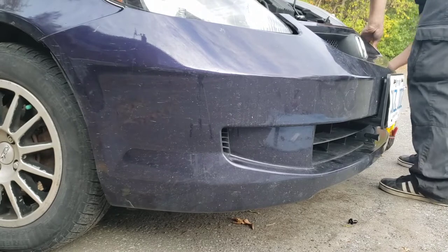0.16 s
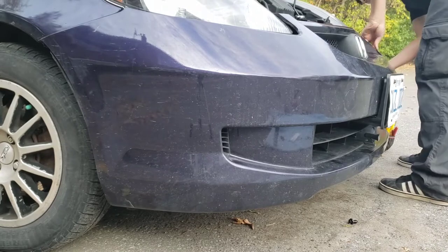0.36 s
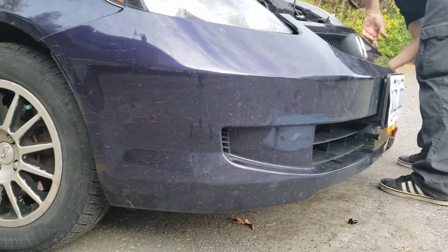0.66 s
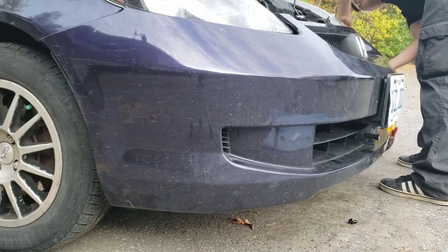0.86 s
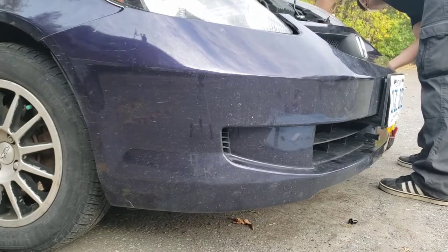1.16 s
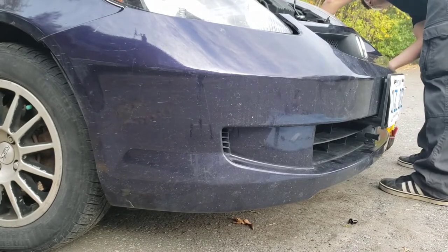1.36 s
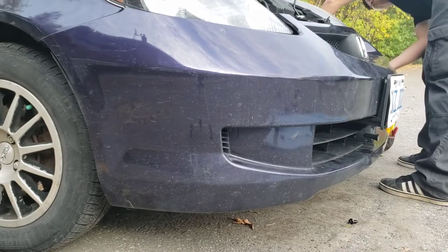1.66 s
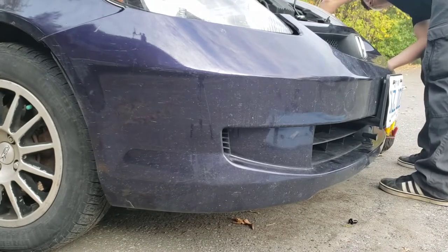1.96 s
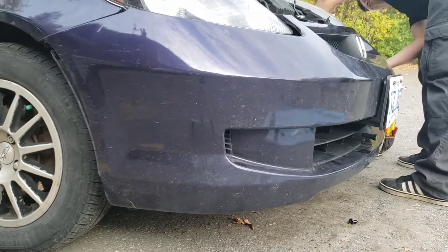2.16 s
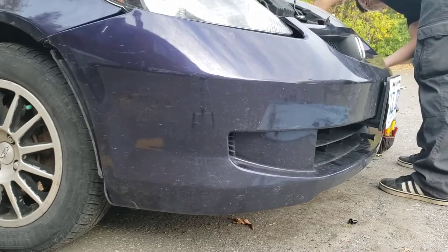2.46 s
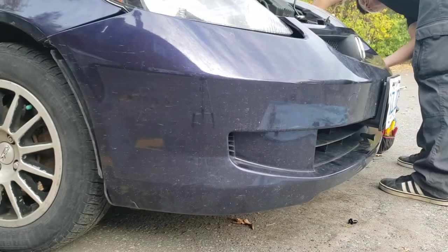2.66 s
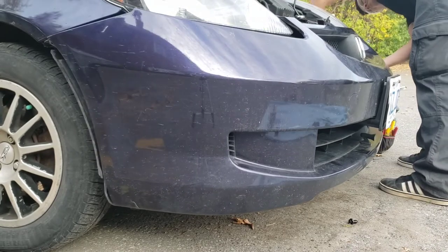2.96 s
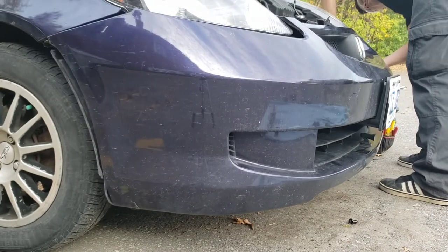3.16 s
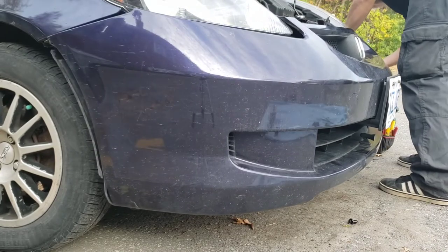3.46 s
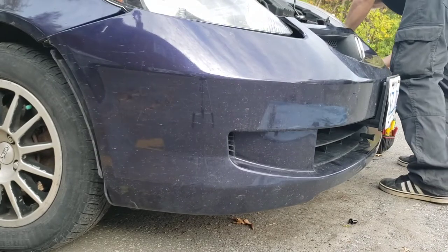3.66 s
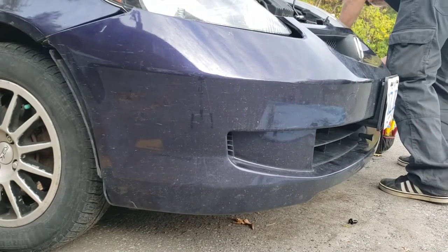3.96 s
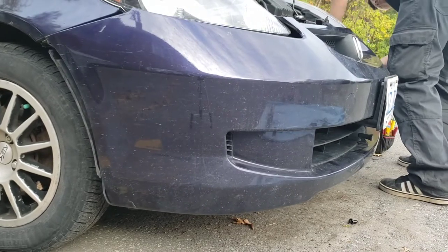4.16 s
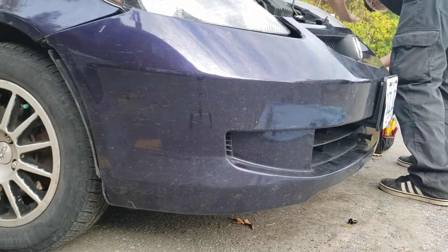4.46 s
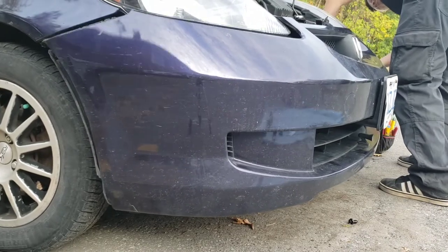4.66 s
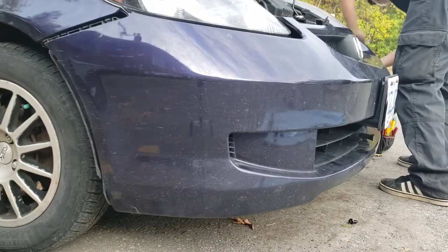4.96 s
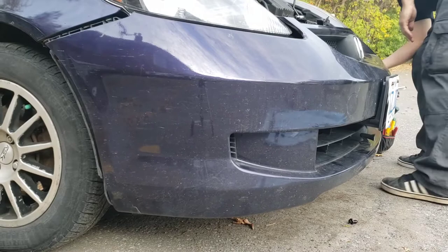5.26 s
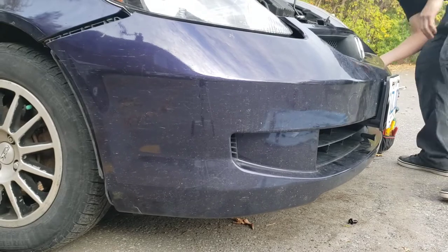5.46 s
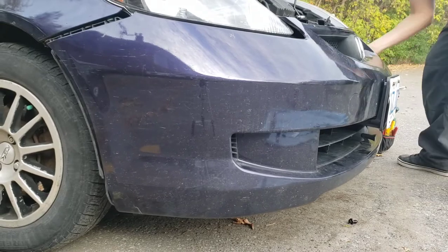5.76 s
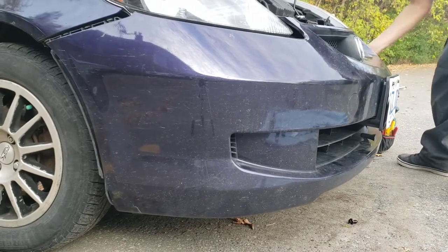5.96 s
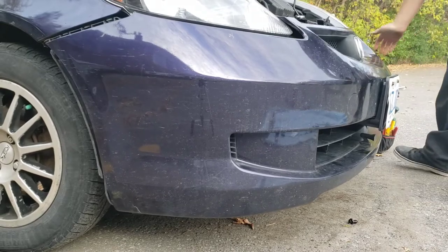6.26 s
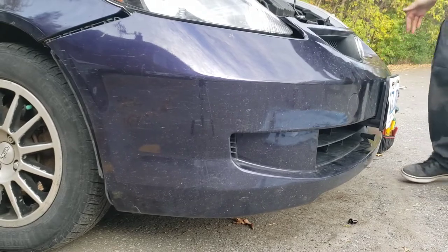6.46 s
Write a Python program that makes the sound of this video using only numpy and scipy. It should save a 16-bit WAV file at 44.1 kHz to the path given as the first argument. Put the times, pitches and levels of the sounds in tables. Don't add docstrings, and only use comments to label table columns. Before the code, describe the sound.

Outdoors, hands fit a loose car panel with light clacking knocks and a firmer push, then one hard rattling slam over faint engine and traffic rumble.

```python
import sys
import numpy as np
from scipy import signal
from scipy.io import wavfile

SR = 44100
rng = np.random.default_rng(int(sys.argv[2]) if len(sys.argv) > 2 else 0)


def int16_out(signal):
    q = np.round(np.clip(np.atleast_2d(signal).T, -1, 1) * 32767)
    wavfile.write(sys.argv[1], SR, q.astype(np.int16))


def convert_level_to_amplitude(level_db):
    exponent = np.asarray(level_db, float) / 20
    return 10 ** exponent


N = 291501
EDGES_HZ = 23.5 * 2 ** np.arange(0, 9.7, .5)

# (multiple of idle rate [-], level [dB])
IDLE_ORDERS_DB = [(1, 7), (2, 2), (3, -12), (4, 0), (5, 1.5), (6, -0.5), (7, -3), (8, -8.5), (9, -14.5),
                  (10, -10.5)]
IDLE_HZ, IDLE_WANDER_HZ, IDLE_DB, IDLE_FADE_DB_PER_S = 28.6, 0.2496, -41.5, 0.37

# (frequency [Hz], density [dB/Hz])
RUMBLE_SPECTRUM_DB = [(13, -51), (22, -11.5), (38, -4.5), (64, 1.5), (91, 4.5), (135, -11), (178, -4),
                      (304, -18), (365, -25.5), (500, -26), (650, -50), (1100, -120)]
# (frequency [Hz], density [dB/Hz])
ROAR_SPECTRUM_DB = [(150, -28), (250, -7.5), (304, -7), (380, -16.5), (692, -6), (1310, -3.5), (1760, -7),
                    (2710, -18), (3690, -16), (5010, -54), (7000, -62), (9100, -94), (15400, -120)]
# (time [s], level [dB])
TRAFFIC_DB = [(0.0, -38.5), (1.1, -39.5), (1.6, -36.5), (2.0, -38.5), (2.23, -31.5), (2.4, -42),
              (2.8, -36.5), (3.1, -40.5), (3.42, -37.5), (3.9, -39.5), (5.43, -41), (5.72, -38.5),
              (6.17, -41.5), (6.61, -40.5)]
# (time [s], hollow note [Hz], level [dB])
PASSING_HZ_DB = [(0.0, 700, -55.5), (1.12, 695, -49.5), (2.1, 632, -51.5), (2.4, 639, -45.5),
                 (2.8, 630, -42.5), (3.05, 612.4, -47.5), (3.28, 704.5, -45.5), (3.48, 767, -43),
                 (3.7, 730, -47), (3.9, 687, -51), (5.0, 698, -53), (5.72, 700, -48.5), (6.61, 694, -55)]
ROAR_DB, ROAR_TRAFFIC_SHARE, ROAR_PASSING_SHARE = -56.5, 0.13, 0.2
WHINE_DB, WHINE_FROM_S, WHINE_TO_S = -51, 1.52, 4.37

# (frequency [Hz], left-right correlation [-])
FAR_ALIKE = [(60, 1), (130, 0.94), (290, 0.71), (640, 0.45), (1410, -0.81), (3100, 1), (6820, -0.55),
             (15000, 0.16)]
# (frequency [Hz], left minus right [dB])
FAR_BALANCE_DB = [(60, 0.5), (180, -0.5), (550, 1), (1650, 1), (4970, 20.5), (15000, -9.5)]
# (frequency [Hz], left-right correlation [-])
NEAR_ALIKE = [(60, 1.0), (130, 0.94), (290, 1), (640, 0.98), (1410, 0.61), (3100, 0.1), (6820, 0.082),
              (15000, 0.1)]
# (frequency [Hz], left minus right [dB])
NEAR_BALANCE_DB = [(60, 2.5), (180, 0.5), (550, 1.5), (1650, 4), (4970, -1), (15000, -4.5)]
FAR_LAG_S, NEAR_LAG_S = .00007, .0001

# (time [s], bright peak [dB], length [s], dull part re bright [dB])
MOVES = [(0.02, -62, 0.23, 1), (0.14, -64, 0.2, -6), (0.304, -83, 0.36, 1), (0.544, -75.5, 0.28, -14),
         (1.08, -67, 0.19, -6), (1.242, -81, 0.23, 3), (2.26, -66, 0.26, -1), (2.4, -80.5, 0.42, 0),
         (3.41, -79, 0.24, 0), (3.603, -83, 0.35, 2), (3.907, -74.5, 0.28, -2), (5.506, -68.5, 0.6, -2),
         (5.578, -58, 0.1, -10), (5.66, -68, 0.35, -3.5), (6.15, -73, 0.8, -2.5), (6.258, -64, 0.2, 1.5)]
STILL_DB, STILL_DULL_DB = -85.5, 8.0
RISE_SHARE, SWING_DB, ROUNDNESS = 0.42, 20.5, 1.26

# (time [s], peak [dB], bright part re dull [dB])
GRIT_TICKS = [(0.024, -43, -14), (0.118, -56, 8), (1.054, -52, -8), (1.6385, -42, -3), (2.231, -43, 6),
              (2.2495, -43, 7), (2.304, -42, 9), (2.346, -55, 6), (3.509, -48, 0), (3.528, -50, -6),
              (3.8843, -53, 7), (3.906, -46, 3), (4.1858, -58, -9), (5.2784, -56, 0), (5.5515, -44, 4),
              (5.5599, -40.5, 10), (5.5746, -36.5, 13), (5.5885, -42.5, 18), (5.601, -44, 0),
              (5.656, -48, 3), (5.9832, -63, 6), (6.0586, -56, 3), (6.0896, -54, 3), (6.119, -43, 6),
              (6.125, -58, 6), (6.145, -56, 0), (6.1555, -48, 2), (6.1765, -53, 8), (6.194, -45, 2),
              (6.217, -47, 2), (6.2374, -44, 2), (6.2452, -42, 5), (6.2505, -44, 0), (6.271, -44, 2),
              (6.287, -54, 8), (6.295, -47, 4), (6.331, -48, -4), (6.347, -53, -8)]
GRIT_T60_S, SCUFF_DB, SCUFF_T60_S = 0.0078, -41.5, 0.03

# (time [s], length [s], start [Hz], end [Hz], peak [dB])
STREAKS = [(2.15, .05, 620, 620, -42), (2.43, .12, 600, 600, -47), (2.42, .13, 650, 645, -43),
           (2.43, .11, 697, 690, -47), (2.6, .12, 600, 585, -48), (2.66, .17, 630, 642, -44),
           (2.66, .18, 545, 545, -46), (2.88, .09, 650, 630, -44), (2.93, .14, 540, 545, -46),
           (3.08, .14, 648, 645, -46), (3.17, .09, 805, 800, -48), (3.22, .12, 770, 770, -48),
           (3.33, .08, 670, 678, -46), (3.36, .16, 778, 750, -43), (3.49, .08, 660, 640, -46),
           (3.58, .08, 760, 760, -49)]
STREAK_WOBBLE_RAD = 1.3

# (time [s], peak [dB], frequency [Hz], t60 [s])
PANEL_NOTES = [(1.617, -26, 1440, 0.034), (2.198, -24, 559, 0.13), (2.305, -20, 1290, 0.038),
               (3.515, -40, 1650, 0.07), (3.795, -17, 565, 0.11), (3.797, -13.5, 1322, 0.04),
               (3.797, -32, 3320, 0.035), (4.652, -13.5, 286, 0.2), (4.655, -21, 360, .15),
               (3.512, -34, 400, .08), (3.243, -36, 600, .05), (4.653, -18, 452, 0.13),
               (4.648, -16, 1317, 0.08), (3.80, -23, 1008, 0.086), (5.79, -32, 390, 0.07),
               (1.640, -24, 2050, 0.027), (2.3065, -16, 213, .14), (3.80, -22.5, 782, .1),
               (3.81, -32, 255, 0.17), (4.652, -27, 821, 0.14), (4.652, -19, 1525, .1),
               (4.652, -26.5, 2430, 0.09), (4.652, -20, 3520, .09), (4.6453, -5, 156, .07),
               (4.651, -18, 53, .25), (4.644, -17, 85, .15), (4.656, -23, 607, .2), (4.66, -26, 685, .2),
               (4.651, -21, 917, .15), (4.66, -26, 1194, .2), (4.65, -21, 1800, .06),
               (4.655, -29, 1965, .13), (4.68, -30, 2627, .1), (4.675, -29, 2918, .1),
               (4.655, -24, 3391, .09), (4.69, -27, 245, .15), (4.685, -29, 764, .2), (3.80, -21, 305, .2),
               (3.80, -29, 1195, .1), (3.80, -30, 1405, .1), (3.80, -36, 1744, .1), (3.82, -26, 95, .12),
               (2.3065, -15, 285, .12), (2.306, -29, 603, .05), (2.305, -30, 2400, .04),
               (2.198, -28, 220, .09), (2.22, -32, 791, .1), (2.2, -30, 90, .1), (2.255, -32, 270, .12)]
# (frequency [Hz], width [Hz], level [dB])
PANEL_MODES = [(441, 17.7, -14), (820, 160, 4), (1390, 210, -13.5), (1560, 29, -3.5), (1870, 370, -9.5),
               (1900, 13, -12.5), (2060, 38, -8), (2430, 61, -8), (2840, 380, -9), (2987, 69, -5),
               (3374, 44, -8.5), (3800, 25, -35), (4340, 43, -36), (4800, 27, -33), (4750, 120, -12),
               (5550, 38, -24.5)]
# (frequency [Hz], density [dB/Hz])
BLOW_SPECTRUM_DB = [(40, -18), (60, 6), (130, -3), (280, -5), (600, -4.5), (1300, -7.5), (2500, -22.5),
                    (4500, -28.5), (7000, -31.5), (12000, -54), (16000, -34)]
# (frequency [Hz], t60 [s])
TAIL_T60_S = [(50, 0.21), (300, 0.23), (1500, 0.15), (6000, 0.21), (13000, 0.11)]
ECHO_DB, ECHO_T60_S = -16, 0.57
# (time [s], peak [dB], t60 [s])
SHELL_BOOMS = [
    (1.639, -37, 0.11),
    (2.199, -30, 0.078),
    (2.308, -24.5, 0.085),
    (3.799, -21, 0.14),
    (4.640, -15, 0.068),
    (4.679, -37, 0.051),
]
# (time [s], peak [dB], t60 [s], topmost half-octave re rest [dB])
SIZZLES = [(1.615, -64, .04, 0), (1.638, -36, .03, -2), (2.196, -47, .06, 0), (2.219, -46, .05, 0),
           (2.2305, -35, .025, 0), (2.238, -43, .05, 0), (2.249, -34, .025, 0), (2.260, -41, .06, 0),
           (2.274, -44, .06, 0), (2.287, -44, .06, 0), (2.303, -31, .018, 2), (2.310, -47, .06, 0),
           (2.416, -54, .05, 0), (3.508, -38, .07, -2), (3.74, -58, .06, 0), (3.778, -52, .1, 0),
           (3.792, -40, .06, -8), (3.798, -35, .07, -6), (3.812, -45, .08, -7), (4.645, -28, .04, 0),
           (4.650, -13, .035, 1), (4.660, -21, .05, 0), (4.671, -20, .045, 3), (4.684, -22, .035, 0),
           (6.197, -55, .06, 0), (6.24, -47, .04, 0), (6.288, -55, .06, 0)]

# (time [s], knock peak [dB], thud [dB], crack [dB])
KNOCKS = [(1.369, -41, -32, -60), (1.615, -17.5, -29.5, -52), (1.638, -18.5, -33, -33),
          (2.163, -28, -28, -60), (2.195, -14.5, -24, -39), (2.217, -19, -30, -38.5),
          (2.230, -21, -39, -36), (2.248, -23.5, -34, -37), (2.264, -24, -29.5, -41),
          (2.276, -23, -32, -44), (2.303, -11, -28, -32), (2.319, -30, -30, -44),
          (2.413, -27.5, -30.5, -50), (2.524, -34, -42, -64), (2.919, -33, -30, -62),
          (2.937, -40, -31, -53), (3.02, -30, -38, -74), (3.241, -25, -38, -64), (3.509, -27.5, -29.5, -41),
          (3.740, -25, -29.5, -50), (3.785, -16.5, -24, -53), (3.791, -14.5, -19, -31),
          (3.798, -15, -21, -35), (3.812, -19, -26, -37), (3.825, -24, -30, -51), (5.79, -34, -30, -66),
          (6.197, -50, -38, -46), (6.24, -34, -45, -39.5), (6.288, -45, -42, -46)]
KNOCK_T60_S, KNOCK_SIZZLE_DB = 0.046, -6.5
SOFT_DB, SOFT_HZ, FIRM_DB, FIRM_HZ, SPOT_SPREAD = -30, 154.5, -29.5, 260, 0.1
# (time [s], knock peak [dB], thud [dB], crack [dB], rattle t60 [s])
SLAM_STEPS = [
    (4.643, -9, -24, -34, 0.1),
    (4.648, -5, -30, -19, 0.037),
    (4.650, -4, -30, -15, 0.04),
    (4.657, -12, -23, -20, 0.046),
    (4.673, -14.5, -40, -24, 0.051),
    (4.684, -12, -26.5, -26, 0.035),
]
SLAM_THUD_HZ, SLAM_SIZZLE_DB, SIZZLE_LASTS = 156, -1.5, 1.4
BOUNCES, BOUNCE_S, BOUNCE_GAP_S, BOUNCE_SLOWING, BOUNCE_T60_S = 6, 4.666, 0.0067, 1.2, 0.061
BOUNCE_DB, BOUNCE_LOSS_DB = (-24.5, -28, -27.5), (3.5, 3, 10)

MIC_DIP_HZ, MIC_DIP_WIDTH_HZ, MIC_DIP_DEPTH = 8090, 3800, 0.79
MIC_PEAK_HZ, MIC_PEAK_WIDTH_HZ, MIC_PEAK_DB = 12800, 2200, -1
DUCK_DB, DUCK_S, DUCK_TAKES_S = -5.5, 4.747, 0.25


def rms_one(x):
    return x / np.sqrt(np.mean(x ** 2) + 1e-20)


def in_time(rows):
    s, *columns = np.transpose(rows)
    return [np.interp(np.arange(N) / SR, s, c) for c in columns]


def at_hz(points, hz):
    table_hz, values = np.transpose(points)
    return np.interp(np.log(hz), np.log(table_hz), values)


def drift(rate_hz):
    r = np.exp(-80 * np.pi * rate_hz / SR)
    slow = signal.lfilter([1], [1, -2 * r, r * r], rng.standard_normal(N // 40 + 2002))[2000:]
    return np.interp(np.arange(N) / 40, np.arange(len(slow)), rms_one(slow))


def decay(clicks, t60_s):
    return signal.lfilter([1], [1, -convert_level_to_amplitude(-60 / (t60_s * SR))], clicks + 1e-18)


def resonance(x, hz, width_hz):
    r = np.exp(-np.pi * width_hz / SR)
    poles = [1, -2 * r * np.cos(2 * np.pi * hz / SR), r * r]
    return signal.lfilter([(1 - r * r) / 2, 0, (r * r - 1) / 2], poles, x)


def steep(x, hz, kind):
    return signal.sosfilt(signal.butter(4, hz, kind, fs=SR, output="sos"), x)


def band(x, k):
    return signal.sosfilt(signal.butter(2, EDGES_HZ[k:k + 2], "band", fs=SR, output="sos"), x)


def band_centre_hz(k):
    return np.sqrt(EDGES_HZ[k] * EDGES_HZ[k + 1])


def ports(pair, alike):
    return np.sqrt(1 + alike) * pair[0] + np.sqrt(1 - alike) * pair[1] * np.array([[1], [-1]])


def balance(left_minus_right_db):
    return convert_level_to_amplitude(left_minus_right_db * np.array([[.5], [-.5]]))


def grains(per_s, spread_db):
    sizes = convert_level_to_amplitude(spread_db * np.minimum(rng.exponential(1, (2, N)), 4)) * rng.choice([-1, 1], (2, N))
    return rms_one(sizes * (rng.random((2, N)) < per_s / SR))


def arrive(x, lag_s):
    n = np.arange(N)
    return np.array([np.interp(n - round(lag_s * SR), n, x[0]), x[1]])


def surroundings():
    rumble_db, drone_db = in_time(TRAFFIC_DB)[0], in_time(PASSING_HZ_DB)[1]
    roar_db = ROAR_DB + ROAR_TRAFFIC_SHARE * (rumble_db - rumble_db.mean())
    roar_db = roar_db + ROAR_PASSING_SHARE * (drone_db - drone_db.mean())
    white = rng.standard_normal((2, 2, N))
    rumble, roar, drone = np.zeros((3, 2, N))
    for k in range(17):
        hz = band_centre_hz(k)
        noise = ports(band(white[k % 2], k), at_hz(FAR_ALIKE, hz)) * balance(at_hz(FAR_BALANCE_DB, hz))
        if hz < 500:
            rumble += noise * convert_level_to_amplitude(at_hz(RUMBLE_SPECTRUM_DB, hz) + 1.5 * drift(4.0))
        if hz > 250:
            roar += noise * convert_level_to_amplitude(at_hz(ROAR_SPECTRUM_DB, hz) + .8 * drift(8.0))
        drone += noise * convert_level_to_amplitude(-7.0 * np.log2(hz / 600) ** 2 + 1.5 * drift(6.0))
    roar = steep(roar, 4210, "low")
    out = convert_level_to_amplitude(rumble_db - 2.5) * rms_one(rumble)
    out += convert_level_to_amplitude(roar_db + 5.0) * rms_one(roar)
    return out + convert_level_to_amplitude(drone_db - 0.5) * rms_one(drone)


def whine():
    hz, near_db = in_time(PASSING_HZ_DB)
    turn, t = 2 * np.pi * np.cumsum(hz) / SR, np.arange(N) / SR
    note = np.array([drift(30.0) * np.sin(turn) + drift(31.0) * np.cos(turn) for _ in range(2)])
    heard = np.clip(np.minimum(t - WHINE_FROM_S, WHINE_TO_S - t) / 0.61, 0, 1)
    return convert_level_to_amplitude(WHINE_DB + near_db - near_db.max()) * heard * ports(note, 0.49)


def engine():
    hz = IDLE_HZ + IDLE_WANDER_HZ * drift(0.8)
    level_db = IDLE_DB - IDLE_FADE_DB_PER_S * np.arange(N) / SR
    turn = 2 * np.pi * np.cumsum(hz) / SR
    hum = np.zeros(N)
    for k, db in IDLE_ORDERS_DB:
        if k > 1:
            hum += convert_level_to_amplitude(db + 1.87 * drift(3.6)) * np.sin(k * turn + rng.uniform(0, 2.2))
    return convert_level_to_amplitude(level_db) * rms_one(hum)


def rustle():
    t = np.arange(0, N, 32) / SR
    bright_gain, dull_gain = convert_level_to_amplitude(STILL_DB), convert_level_to_amplitude(STILL_DB + STILL_DULL_DB)
    for s, db, length_s, dull_db in MOVES:
        away = np.maximum((s - t) / (RISE_SHARE * length_s), (t - s) / ((1 - RISE_SHARE) * length_s))
        move = convert_level_to_amplitude(db - SWING_DB * np.minimum(away, 4) ** ROUNDNESS)
        bright_gain, dull_gain = bright_gain + move, dull_gain + move * convert_level_to_amplitude(dull_db)
    bright_gain, dull_gain = in_time(np.transpose([t, bright_gain, dull_gain]))
    fibres = grains(7800, spread_db=3.0) * convert_level_to_amplitude(0.61 * drift(50.0))
    bright = steep(fibres, 7900, "high") * balance(-3.0)
    dull = steep(steep(fibres, 2400, "high"), 5160, "low")
    return convert_level_to_amplitude(2.5) * bright_gain * rms_one(bright) + convert_level_to_amplitude(5) * dull_gain * rms_one(dull)


def grit():
    ticks, scuffs = np.zeros((2, 2, N))
    for s, db, bright_db in GRIT_TICKS:
        clicks = scuffs if db > SCUFF_DB else ticks
        clicks[:, round(s * SR)] = convert_level_to_amplitude([db + 4.5, db - 1.5 + bright_db])
    bursts = decay(ticks, GRIT_T60_S)
    bursts += decay(scuffs, SCUFF_T60_S) - decay(scuffs, SCUFF_T60_S / 4)
    dull, bright = bursts[:, None] * rng.standard_normal((2, N))
    return 1.55 * resonance(dull, 4700, 3300) + 0.48 * resonance(bright, 11500, 8500)


def streaks():
    out, wobble = np.zeros(N), STREAK_WOBBLE_RAD * drift(12.0)
    for s, length_s, hz, end_hz, db in STREAKS:
        i, n = round(s * SR), round(length_s * SR)
        turn = 2 * np.pi * np.cumsum(np.linspace(hz, end_hz, n)) / SR + wobble[i:i + n]
        out[i:i + n] += convert_level_to_amplitude(db - 1.5) * np.sqrt(np.hanning(n)) * np.sin(turn)
    return out * balance(3.0)


def panel_notes():
    out, t = np.zeros(N), np.arange(SR // 4) / SR
    for s, db, hz, t60_s in PANEL_NOTES:
        i = round(s * SR)
        out[i:i + len(t)] += convert_level_to_amplitude(db - 60 * t / t60_s) * (1 - np.exp(-t / 0.0045)) * np.sin(2 * np.pi * hz * t)
    return out


def all_blows():
    rows = []
    for s, knock, thud, crack in KNOCKS:
        thud_hz = np.interp(thud, [SOFT_DB, FIRM_DB], [SOFT_HZ, FIRM_HZ])
        rows.append((s, knock, thud, crack, crack + KNOCK_SIZZLE_DB, KNOCK_T60_S, thud_hz))
    for s, knock, thud, crack, t60_s in SLAM_STEPS:
        rows.append((s, knock, thud, crack, crack + SLAM_SIZZLE_DB, t60_s, SLAM_THUD_HZ))
    s = BOUNCE_S
    for k in range(BOUNCES):
        knock, thud, crack = np.array(BOUNCE_DB) - k * np.array(BOUNCE_LOSS_DB)
        rows.append((s, knock, thud, crack, crack + SLAM_SIZZLE_DB, BOUNCE_T60_S, FIRM_HZ))
        s += BOUNCE_GAP_S * BOUNCE_SLOWING ** k
    rows = np.array(rows)
    rows[:, 6] *= 1 + SPOT_SPREAD * rng.standard_normal(len(rows))
    return rows


def register(hz):
    return int(np.sum(hz > np.array([170, 400, 2500, 8000, 12000])))


def blow_efforts(rows):
    effort, spent = np.zeros((2, 6, N))
    t = np.arange(SR // 4) / SR

    def strike(layer, s, db, t60_s):
        i = round(s * SR)
        effort[layer, i:i + len(t)] += convert_level_to_amplitude(db) * (1 - np.exp(-t / 0.00077)) * convert_level_to_amplitude(-60 * t / t60_s)
        spent[layer, i + 300] += convert_level_to_amplitude(db) ** 2 * t60_s

    for s, db, t60_s in SHELL_BOOMS:
        strike(0, s, db - 1.02, t60_s)
    for s, knock_db, thud_db, crack_db, _, t60_s, _ in rows:
        strike(1, s, thud_db + 6.5, t60_s)
        strike(2, s, knock_db - 8.5, t60_s)
        strike(3, s, crack_db + 5, t60_s)
    bounces = [(row[0], row[4], SIZZLE_LASTS * row[5], 0) for row in rows[-BOUNCES:]]
    for s, db, t60_s, top_db in list(SIZZLES) + bounces:
        strike(4, s, db - 2, t60_s)
        strike(5, s, db + top_db - 2.5, t60_s)
    return effort, spent


def spot_flex(rows):
    out, t = np.zeros(N), np.arange(SR // 4) / SR
    for s, _, thud_db, _, _, _, thud_hz in rows:
        i = round(s * SR)
        flex = np.sin(2 * np.pi * thud_hz * t) * (1 - np.exp(-t / 0.0016)) * convert_level_to_amplitude(-60 * t / 0.098)
        out[i:i + len(t)] += convert_level_to_amplitude(thud_db + 1) * flex
    return out


def blows():
    rows = all_blows()
    effort, spent = blow_efforts(rows)
    contacts = grains(2600, spread_db=1.0)
    air = 0.74 * rng.standard_normal((2, N)) + 0.78 * np.roll(contacts, SR)
    for s in rows[:, 0]:
        contacts[0, round((s + .0015) * SR)] = 3.7
    lift_db = [16.2, 10.6, 13.35, 21.1, 30.7, 30.6]
    echo = convert_level_to_amplitude(2 * ECHO_DB) * decay(spent, ECHO_T60_S / 2)
    out = np.zeros((2, N)) + spot_flex(rows)
    for k in range(2, len(EDGES_HZ) - 1):
        hz = band_centre_hz(k)
        reg = register(hz)
        tail = np.sqrt(decay(spent[reg], at_hz(TAIL_T60_S, hz) / 2) + echo[reg])
        pair = band(effort[reg] * contacts + convert_level_to_amplitude(2.0) * tail * air, k)
        colour = (-1) ** k * convert_level_to_amplitude(at_hz(BLOW_SPECTRUM_DB, hz) + lift_db[reg])
        out += colour * ports(pair, at_hz(NEAR_ALIKE, hz)) * balance(at_hz(NEAR_BALANCE_DB, hz))
    for k, (hz, width_hz, db) in enumerate(PANEL_MODES):
        reg = register(hz)
        ring = resonance(effort[reg] * contacts, hz, max(width_hz, 25))
        out += (-1) ** k * convert_level_to_amplitude(db + lift_db[reg] - 9.5) * ports(ring, at_hz(NEAR_ALIKE, hz))
    return out


def scene():
    far = surroundings() + whine() + engine() + streaks()
    near = rustle() + grit() + panel_notes() + blows()
    return arrive(far, FAR_LAG_S) + arrive(near, NEAR_LAG_S)


def low_pass(x):
    return signal.sosfilt(signal.butter(12, 15830, fs=SR, output="sos"), x)


def record(dry):
    ducking = np.clip((np.arange(N) / SR - DUCK_S) / DUCK_TAKES_S, 0, 1)
    x = steep(steep(dry * convert_level_to_amplitude(DUCK_DB * ducking), 27, "high"), 18.6, "high")
    x = x - MIC_DIP_DEPTH * resonance(x, MIC_DIP_HZ, MIC_DIP_WIDTH_HZ)
    x = x + convert_level_to_amplitude(MIC_PEAK_DB) * resonance(x, MIC_PEAK_HZ, MIC_PEAK_WIDTH_HZ)
    rounded = 1.3 * np.tanh(x / 1.3)
    mix = signal.sosfilt(signal.cheby2(8, 40, 16700, fs=SR, output="sos"), rounded)
    return low_pass(mix)


dry = scene()
out = record(dry)
int16_out(out)
```